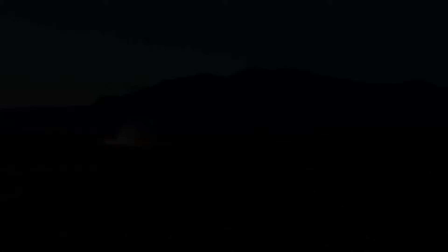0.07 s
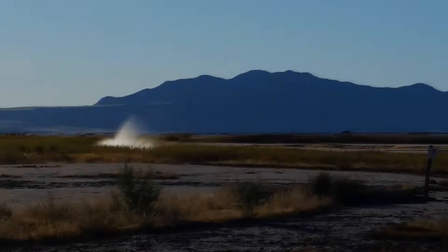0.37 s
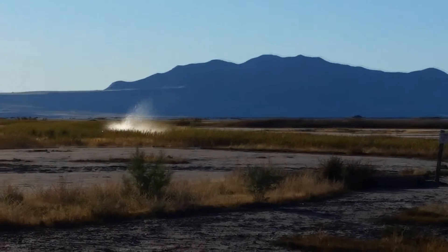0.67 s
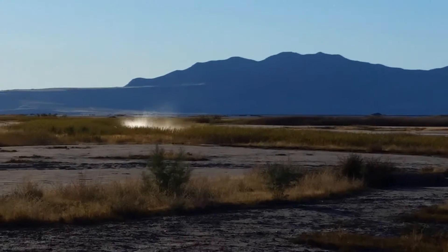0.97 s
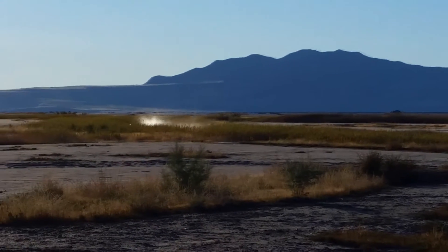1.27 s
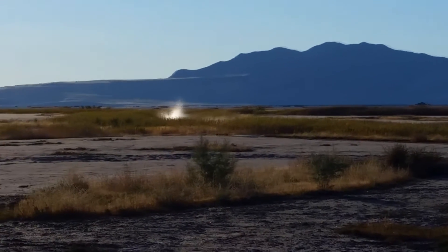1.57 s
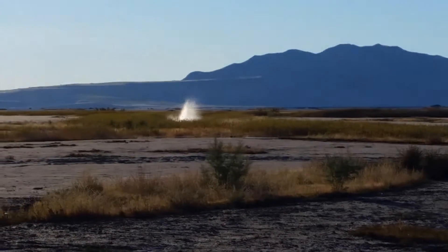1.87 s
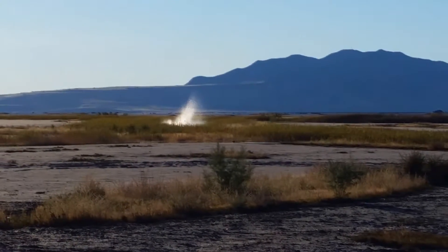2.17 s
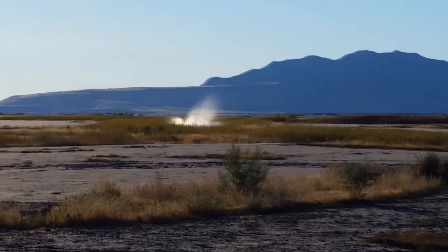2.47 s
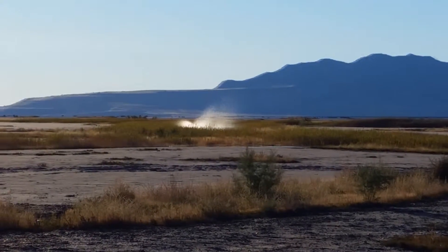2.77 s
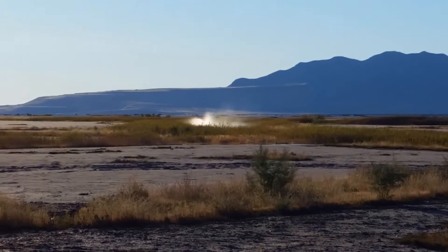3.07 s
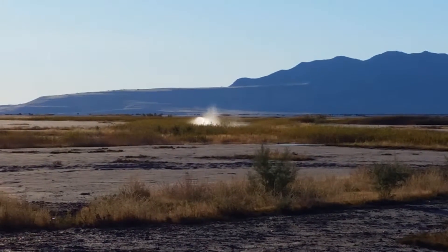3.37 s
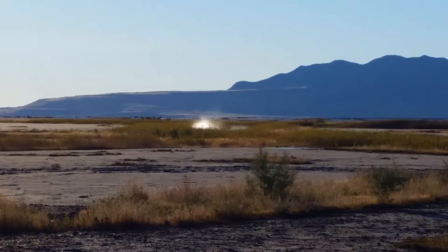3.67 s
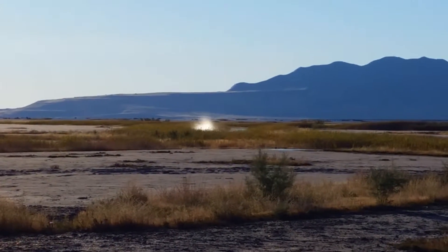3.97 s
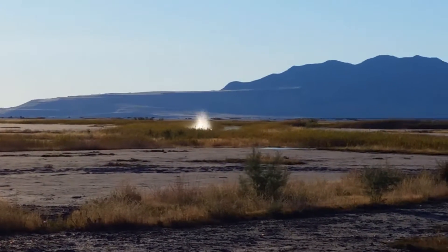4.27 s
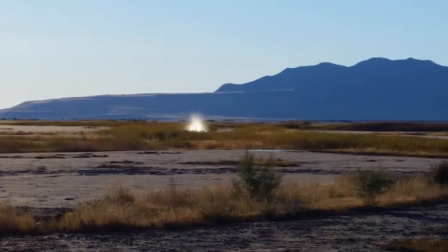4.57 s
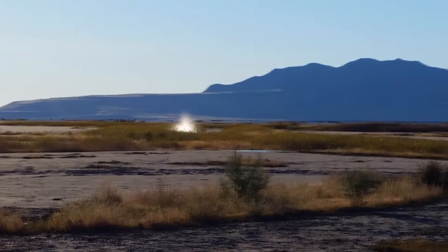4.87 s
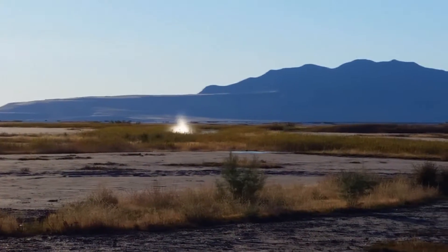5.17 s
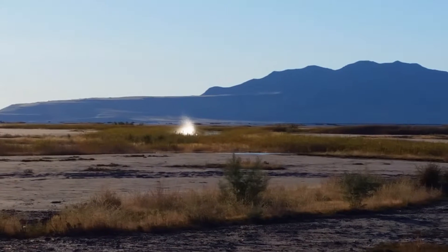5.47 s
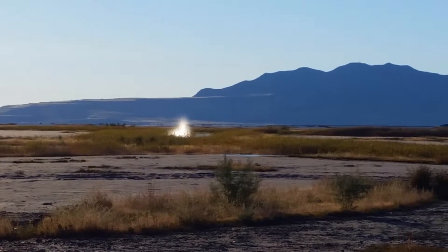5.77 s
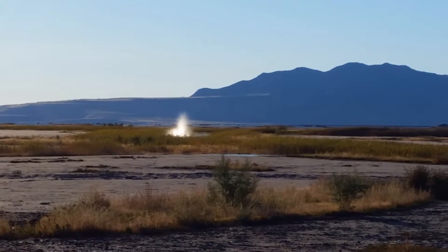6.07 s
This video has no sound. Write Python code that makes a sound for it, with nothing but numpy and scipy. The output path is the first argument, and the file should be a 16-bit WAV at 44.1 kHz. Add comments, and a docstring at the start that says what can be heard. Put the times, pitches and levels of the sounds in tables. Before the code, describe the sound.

Wind buffets the microphone while a distant small boat motor putters on, its fast, thudding exhaust pops sometimes cracking more sharply.

```python
"""Open marshland, a small single-cylinder boat some way off to the left of a two-port microphone.
The sound fades in on its steady popping over a faint hiss of dry grass: each firing booms in the exhaust
chamber, rings the pipe and ends in a sharp crack that the reeds scatter. From 1 to 3 s some crack harder,
while the speed sags and recovers. Wind buffets mostly the right port, hardest near 4 s, as the engine
sags again. A few more hard cracks come just before 6 s."""
import sys
import numpy as np
from scipy.fft import rfft, irfft, next_fast_len
from scipy.io import wavfile
from scipy.ndimage import map_coordinates

SR = 44100
rng = np.random.default_rng(int(sys.argv[2]) if len(sys.argv) > 2 else 0)


def unload_wav(signal):
    """Save mono or channel-first audio to the path in sys.argv[1] as 16-bit WAV at rate SR, clipped to [-1, 1]."""
    wavfile.write(
        sys.argv[1],
        SR,
        np.round(np.clip(np.atleast_2d(signal).T, -1, 1) * 32767).astype(np.int16),
    )


N = 275184
TIME = np.arange(N) / SR
JET_SPREAD_DB = 2.5  # no two firings are alike

# engine speed as firings per second: t/s, f/Hz
FIRING_RATE = [(0.0, 29.05), (0.64, 29.45), (0.96, 27.53), (1.4, 26.13), (2.08, 27.37), (2.52, 30.68),
               (2.79, 30.0), (3.19, 30.37), (3.47, 31.65), (3.61, 31.18), (3.86, 27.45), (4.32, 26.33),
               (4.69, 27.73), (4.83, 27.27), (5.09, 28.57), (5.33, 27.97), (5.78, 28.0), (6.24, 29.6)]


def engine():
    """The boat across the marsh: each firing's thud, then the crack and spit of its gas jet."""
    # jet at the pipe's mouth, relative levels: t/s, crack level/dB, spit level/dB, sizzle level/dB
    jet_levels = [(0.2, -34.5, -42, -63), (0.6, -38.5, -50.5, -54), (0.83, -32.5, -40.2, -43.5),
                  (1.02, -38.5, -47.5, -53), (1.2, -33.5, -43.5, -51), (1.5, -34, -49, -52.6),
                  (2.05, -35, -38, -47.5), (2.5, -32, -44, -48), (3.3, -37, -36.5, -48),
                  (3.92, -43.5, -44, -51), (4.5, -37, -45, -42.5), (5.15, -35, -40.5, -44),
                  (5.45, -37.5, -42.5, -47), (5.95, -37, -37.5, -45), (6.24, -36.5, -40, -48)]
    crack_db, spit_db, sizzle_db = curves(jet_levels, TIME)
    times = firings()
    jets = times + np.abs(rng.normal(.001455, .00018, len(times)))  # the jet trails the pressure front
    cracks = amp(hard_firings(crack_db) - 1.5) * crack(jets)
    tails = amp(crack_db - 5.5) * reeds(jets)
    return exhaust(times) + cracks + gas_jet(jets, spit_db, sizzle_db) + tails


def firings():
    """The times at which the exhaust opens, once in every engine cycle."""
    rate, = curves(FIRING_RATE, TIME)
    cycles = .017 + np.cumsum(rate) / SR
    return np.flatnonzero(np.diff(np.floor(cycles))) / SR


def valve(times, open_share=.38, closing_db=-19, turbulence=.08):
    """A turbulent kick as the valve opens, and a weak push as it shuts a set share of the cycle later."""
    rate, = curves(FIRING_RATE, times)
    opening = unit(place(times, amp(.11 * rng.standard_normal((len(times), 1)))))
    closing = unit(place(times + open_share / rate, np.ones((len(times), 1))))
    return opening + amp(closing_db) * closing + turbulence * puffs(times, .0005, t60=.04, spread_db=1)


def exhaust(times):
    """A slug of gas kicks the chamber and the pipe; the load decides which of them answers most."""
    # resonances of the exhaust chamber and, above it, the tail pipe: f/Hz, level/dB
    chamber = [(30, -2), (55, 14.5), (75, 14.5), (97, 28.5), (122, 26), (165, 33.5), (182, 31), (205, 22),
               (225, 20), (248, 25.5), (290, 20), (345, 7)]
    pipe = [(385, 7), (426, 10.5), (463, 3), (545, 8.5), (595, 5), (692, 11), (790, 5), (880, -6.5),
            (1000, -9), (1140, -7.5), (1500, -2), (3000, -60)]
    # thud under load, relative levels: t/s, boom level/dB, growl level/dB, bark level/dB
    load = [(0.2, -27, -42.5, -41.5), (0.65, -27.5, -43, -43.5), (0.92, -25.5, -43, -43),
            (1.45, -26.5, -43.5, -39), (2.55, -28, -40, -34.5), (2.88, -27.8, -44, -38),
            (3.35, -27.5, -37.5, -46.5), (3.55, -27.0, -37.5, -43), (4.4, -28, -43.5, -42),
            (5.8, -27.5, -43.5, -46.5), (6.24, -29.5, -40, -45.5)]
    boom_db, growl_db, bark_db = curves(load, TIME)
    thud = ring_body(valve(times), chamber + pipe)
    below = lambda edge_hz: filtered(thud, lambda hz: 1 / (1 + (hz / edge_hz) ** 10))
    boom, lows = below(350), below(600)
    growl, bark = lows - boom, thud - lows
    return (amp(boom_db + .8) * unit(boom) + amp(growl_db - 2) * unit(growl)
            + amp(bark_db - 1.7) * unit(bark))


def crack(times, rise=.000096, t60=.0027, roughness=.97, spread_db=3.5):
    """The jet breaks out as a small shock with a ragged back, which rings the mouth of the pipe."""
    # resonances of the pipe's mouth: f/Hz, width/Hz, level/dB
    mouth = [(1143, 200, -8), (1638, 65, -8), (1851, 380, 2), (2264, 390, 1)]
    t = np.arange(SR // 100) / SR
    size, width = rng.uniform(-1, 1, (2, len(times), 1))
    shock = np.exp(-t / (rise * (1 + .5 * width)))
    ragged = roughness * rng.standard_normal((len(times), len(t))) * burst(t, 2 * rise, t60)
    snaps = place(times, amp(spread_db * size) * (ragged - shock))
    ring = filtered(snaps, resonator(mouth, soft_hz=5040))
    band_pass = lambda hz: (1 - np.exp(-(hz / 1000) ** 4)) / (1 + (hz / 3000) ** 6)
    return unit(filtered(ring, band_pass))


def hard_firings(crack_db, crest_db=16):
    """The crack's level, reset for each hard firing; crest_db is a crack's peak over its mean."""
    # firings that crack harder than their neighbours: t/s, relative peak level/dB
    hard_cracks = [(0.8579, -14), (1.1129, -18), (1.262, -15), (1.3379, -16), (1.4137, -14), (1.5663, -16),
                   (1.6791, -14), (1.7534, -15), (1.8277, -13), (1.9764, -16), (2.0497, -14), (2.1585, -14),
                   (2.5331, -12), (2.6973, -12), (2.8634, -15), (5.7394, -17), (5.8107, -15), (5.9868, -16)]
    for s, peak_db in hard_cracks:
        during = (TIME > s - .005) & (TIME < s + .025)
        crack_db = np.where(during, peak_db - crest_db, crack_db)
    return crack_db


def gas_jet(times, spit_db, sizzle_db):
    """Turbulent gas spits and sizzles from the pipe, a quick puff on top of a slower one."""
    # spectra of the spit and the higher sizzle: f/Hz, level/dB
    spit_spectrum = [(1200, -35.5), (2200, -8), (2800, -5.5), (3600, -2), (4200, -13.5), (5200, -34.5),
                     (6800, -43), (9000, -73.5)]
    sizzle_spectrum = [(2500, -43.5), (4300, 1), (5000, 5.5), (5700, -1.5), (6800, -26), (8000, -52),
                       (10000, -80)]
    gas = puffs(times, rise=.00012, t60=.008) + .65 * puffs(times, rise=.00063, t60=.035)
    spit = amp(spit_db - 1.3) * shaped(gas, spit_spectrum)
    sizzle = amp(sizzle_db - 4) * shaped(gas, sizzle_spectrum)
    return spit + sizzle


def reeds(times):
    """Every crack comes back from the reeds as a short diffuse tail, longer at the right port."""
    # spectrum the reeds scatter: f/Hz, level/dB
    scatter = [(300, -53.5), (900, -12), (1150, 0), (1400, -7.5), (1850, 4), (2100, -3), (2340, 1),
               (2800, -8.5), (4000, -42), (7000, -63.5)]
    tail = lambda t60: shaped(puffs(times, rise=.00087, t60=t60), scatter)
    return unit(tail(.02) + .5 * np.array([tail(.094), tail(.2)]))


def wind(flutter_db=2.5, gust_rise_s=.03, gust_fall_s=.025, lee_db=-17.5):
    """A fluttering breeze with short gusts; eddies strike each port separately, the left in the lee."""
    # steady wind on the right port: t/s, level/dB
    breeze_levels = [(0.3, -28), (0.9, -29), (2.4, -27.5), (3.05, -37.5), (3.35, -34.5), (3.7, -31.5),
                     (5.0, -30.5), (5.7, -37), (6.24, -28)]
    # the strongest gusts: t/s, peak level/dB
    gust_peaks = [(0.54, -24.0), (0.93, -21.5), (2.23, -22.5), (2.659, -20.5), (2.799, -22.5),
                  (3.491, -21.5), (3.919, -20), (4.13, -18.5), (4.28, -19.5)]
    # spectrum of the buffeting: f/Hz, level/dB
    buffet = [(10, -25.5), (25, -3), (55, 3.5), (95, 5), (160, -4.5), (250, -20), (450, -28.5), (900, -75)]
    breeze_db, = curves(breeze_levels, TIME)
    breeze = amp(breeze_db + flutter_db * wobble(14))
    gusts = np.zeros(N)
    for s, peak_db in gust_peaks:
        width = np.where(TIME < s, gust_rise_s, gust_fall_s)
        gusts += amp(peak_db) * np.exp(-((TIME - s) / width) ** 2)
    eddies = shaped(rng.standard_normal((2, N)), buffet)
    return eddies * np.hypot(breeze, gusts) * amp([[lee_db], [0]])


def marsh():
    """A steady wash of dry grass in the breeze, much the same at both ports."""
    # spectrum of the grass: f/Hz, level/dB
    grass = [(30, -7.5), (200, 6.5), (420, -2.5), (700, -4.5), (950, -9), (2000, -19.5), (3200, -16),
             (3900, -14.5), (4550, -11), (5600, -21.5), (6800, -40), (8000, -59), (10000, -82.5)]
    shared, left, right = rng.standard_normal((3, N))
    wash = shaped(shared + .5 * np.array([left, right]), grass)
    return wash * amp(-43.5 + .81 * wobble(6.8))


def far_port(x):
    """The right port faces away from the boat: it hears it duller, its low tones slightly later."""
    # shading of that port: f/Hz, level/dB
    shade = [(700, 0.5), (1200, -4), (1900, -7), (2150, -22), (2400, -8), (3200, -18), (4500, -23),
             (6500, -19), (9000, 0)]
    lag = lambda hz: np.exp(-1j * .65 * (hz / 1400) * np.exp((1 - (hz / 1400) ** 2) / 2))
    return filtered(x, lambda hz: colour(shade)(hz) * lag(hz))


def amp(db):
    """Decibels to gain."""
    return 10 ** (np.asarray(db) / 20)


def unit(x):
    """Scale to rms 1."""
    return x / np.sqrt(np.mean(x ** 2) + 1e-20)


def curves(rows, at):
    """Each column after the time, read at the given seconds."""
    s, *cols = np.transpose(rows)
    return [np.interp(at, s, c) for c in cols]


def wobble(rate):
    """A smooth random curve, rate knots a second."""
    return map_coordinates(rng.standard_normal(int(N * rate / SR) + 4), [TIME * rate])


def filtered(x, response):
    """x times a complex response of frequency."""
    size = next_fast_len(N + SR // 2)
    return irfft(rfft(x, size) * response(np.fft.rfftfreq(size, 1 / SR)), size)[..., :N]


def colour(points):
    """The response through (f/Hz, level/dB) points on a log axis."""
    f, db = np.transpose(points)
    return lambda hz: amp(np.interp(np.log(hz + 1), np.log(f + 1), db))


def shaped(x, points):
    """x coloured by a spectrum, at rms 1."""
    return unit(filtered(x, colour(points)))


def resonator(modes, soft_hz):
    """The causal response of resonances to a push with a rounded front."""
    def response(hz):
        ring = sum(amp(db) * 1j * hz * width / (f * f - hz * hz + 1j * hz * width)
                   for f, width, db in modes)
        return ring / (1 + 1j * hz / soft_hz) ** 2
    return response


def ring_body(x, points):
    """x through the minimum-phase body that has this spectrum: it rings only after each push."""
    size = next_fast_len(N + SR // 2)
    cepstrum = irfft(np.log(colour(points)(np.fft.rfftfreq(size, 1 / SR))), size)
    cepstrum[1:size // 2] *= 2
    cepstrum[size // 2 + 1:] = 0
    return irfft(rfft(x, size) * np.exp(rfft(cepstrum)), size)[:N]


def place(times, shots):
    """Lay one short sound at each time."""
    index = np.round(times * SR).astype(int)[:, None] + np.arange(shots.shape[1])
    return np.bincount(index.ravel(), shots.ravel(), N)[:N]


def burst(t, rise, t60):
    """An envelope that swells in rise seconds and falls 60 dB in t60 seconds."""
    return (1 - np.exp(-(t / rise) ** 2)) * amp(-60 * t / t60)


def puffs(times, rise, t60, spread_db=JET_SPREAD_DB):
    """A fresh 40 ms burst of turbulence at each time, each a little stronger or weaker."""
    t = np.arange(SR // 25) / SR
    shots = rng.standard_normal((len(times), len(t))) * burst(t, rise, t60)
    strengths = amp(spread_db * rng.standard_normal((len(times), 1)))
    return unit(place(times, shots * strengths))


def scene():
    """The boat off to the left, grass all round, wind right on the microphone."""
    left, right = engine() + marsh()
    return np.array([left, far_port(right)]) + wind()


def record(dry, top_hz=15950):
    """The microphone's own hiss, a short fade-in, a quick fade-out and the band limit."""
    # spectrum of the hiss: f/Hz, level/dB
    self_noise = [(1000, 5), (4500, 5.5), (6000, -6), (7500, -16.5), (9500, -24), (12000, 0), (15500, -2)]
    hiss = amp(-69) * shaped(rng.standard_normal((2, N)), self_noise)
    fade = np.interp(TIME, [.15, .55, 6.235, 6.24], [0, 1, 1, 0])
    return filtered((dry + hiss) * fade, lambda hz: hz < top_hz)


dry = scene()
out = record(dry)
unload_wav(out)
```